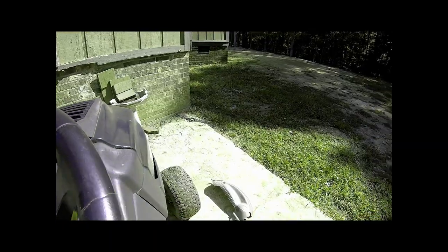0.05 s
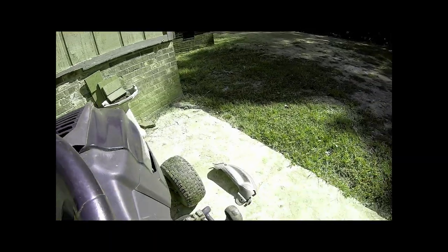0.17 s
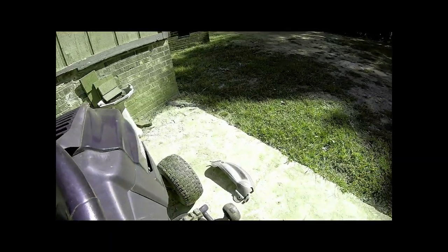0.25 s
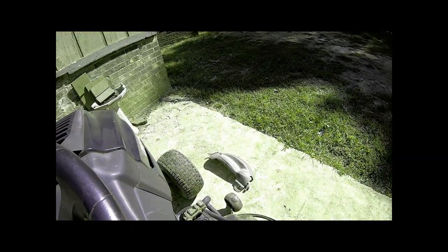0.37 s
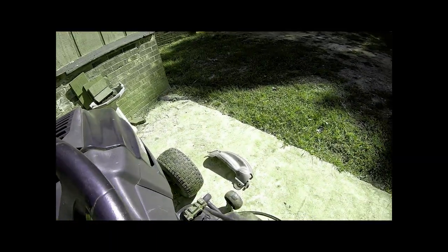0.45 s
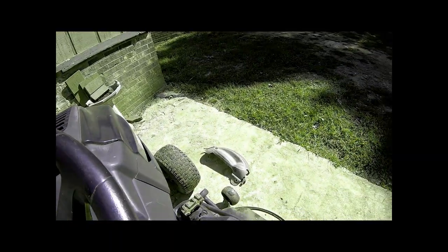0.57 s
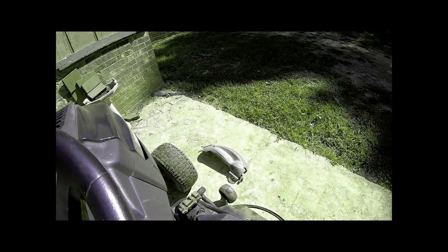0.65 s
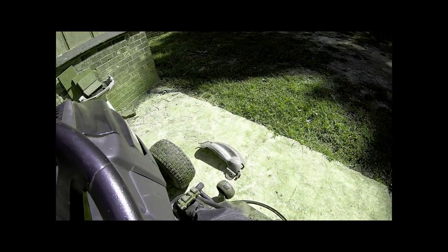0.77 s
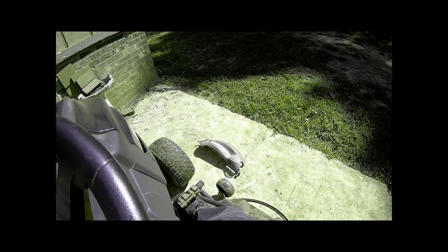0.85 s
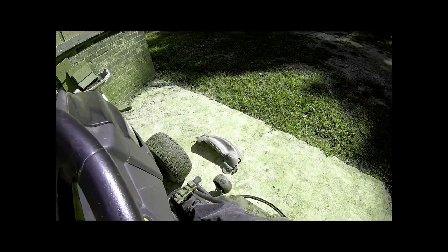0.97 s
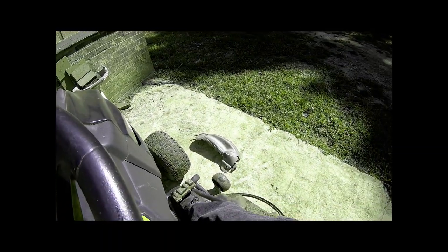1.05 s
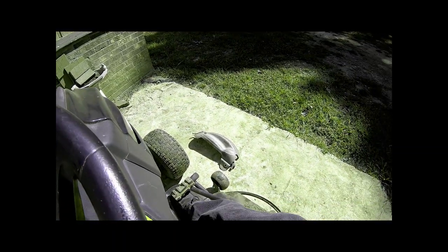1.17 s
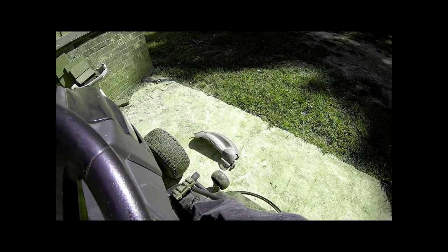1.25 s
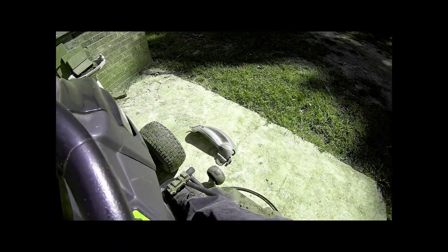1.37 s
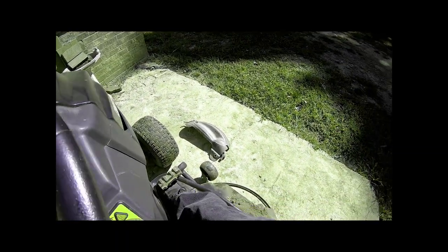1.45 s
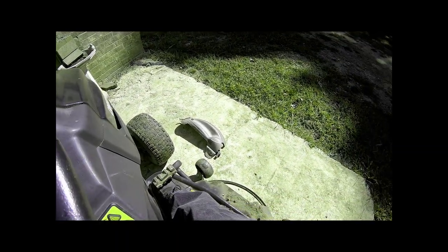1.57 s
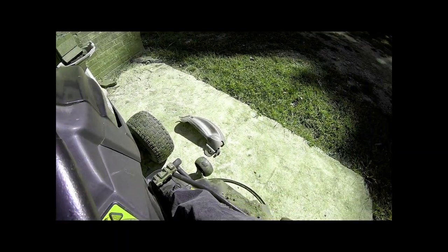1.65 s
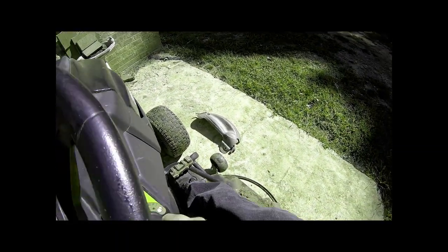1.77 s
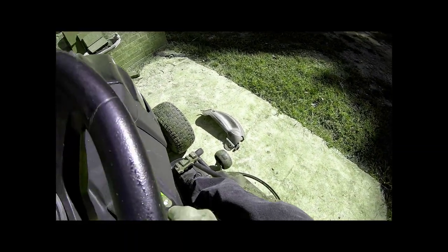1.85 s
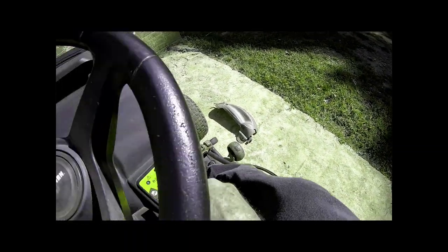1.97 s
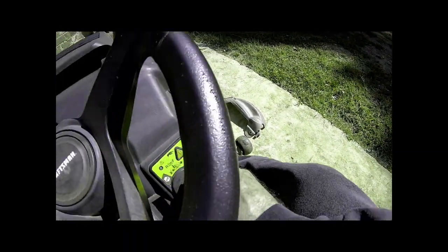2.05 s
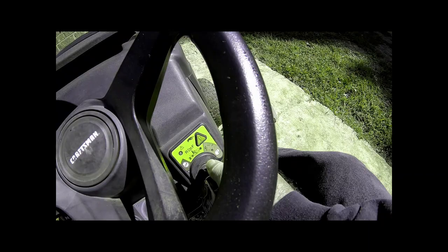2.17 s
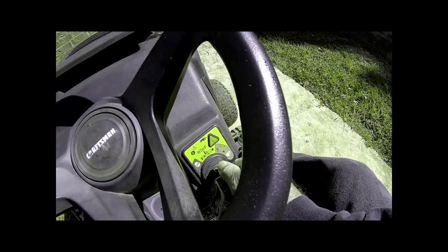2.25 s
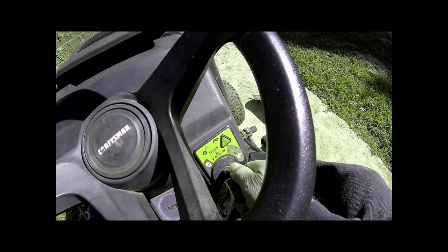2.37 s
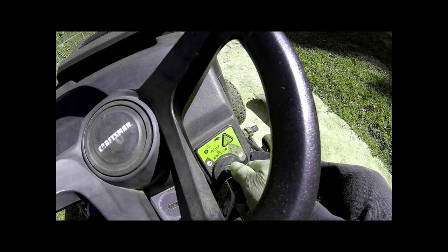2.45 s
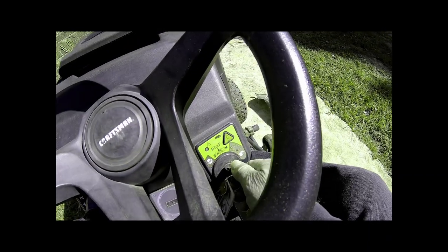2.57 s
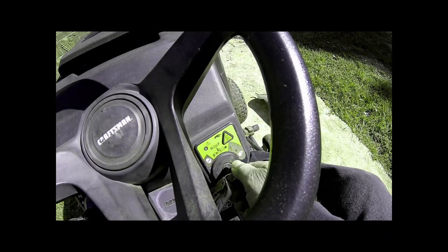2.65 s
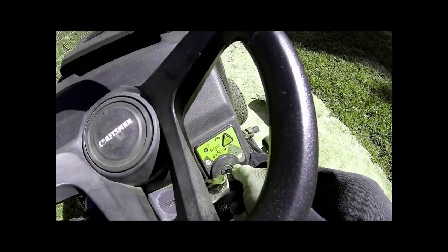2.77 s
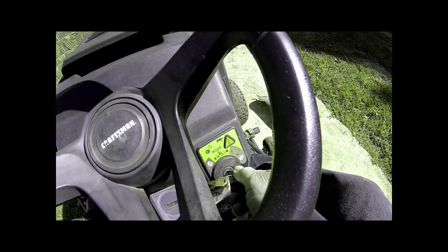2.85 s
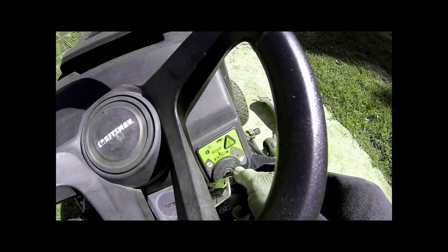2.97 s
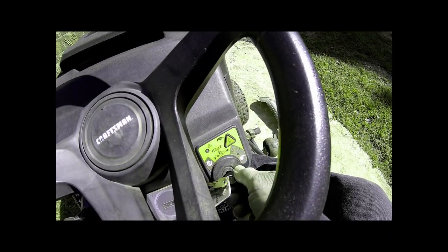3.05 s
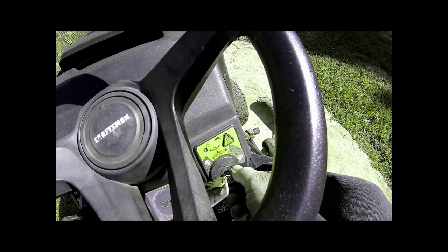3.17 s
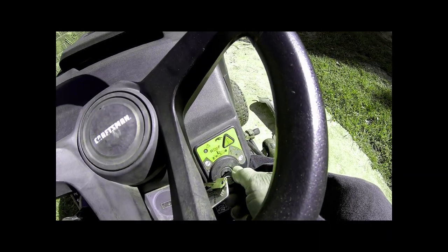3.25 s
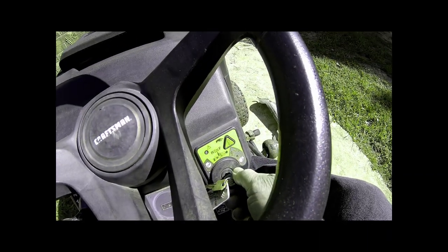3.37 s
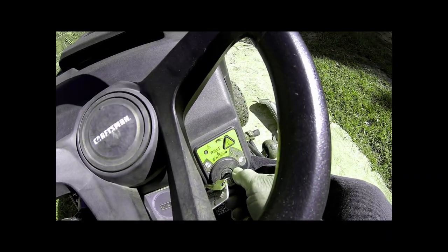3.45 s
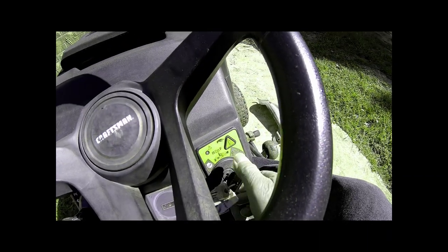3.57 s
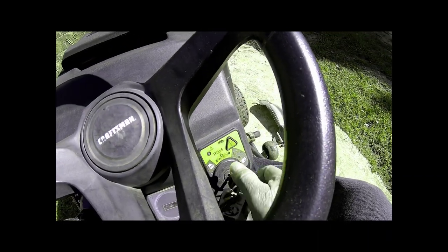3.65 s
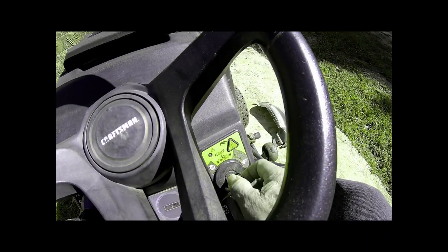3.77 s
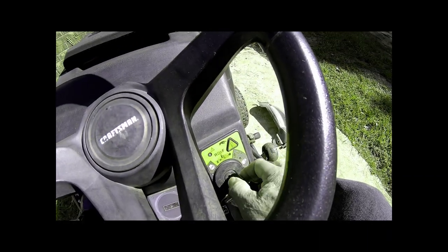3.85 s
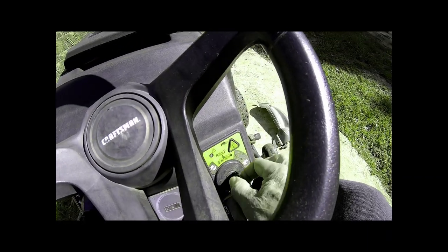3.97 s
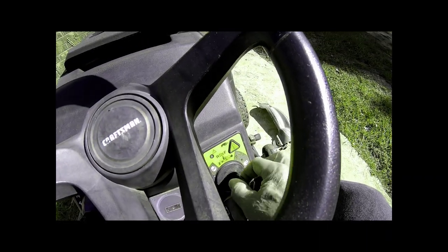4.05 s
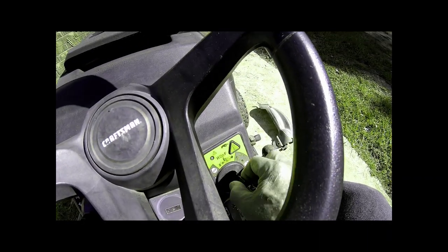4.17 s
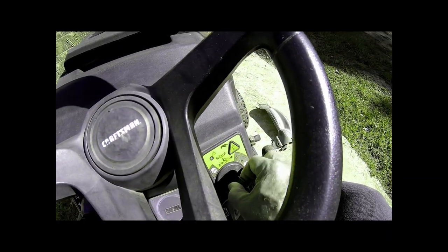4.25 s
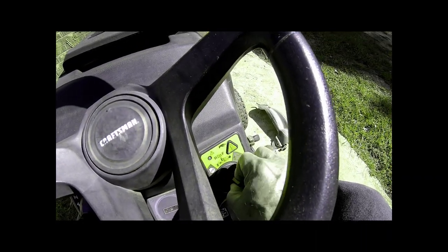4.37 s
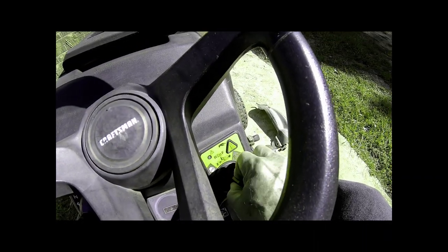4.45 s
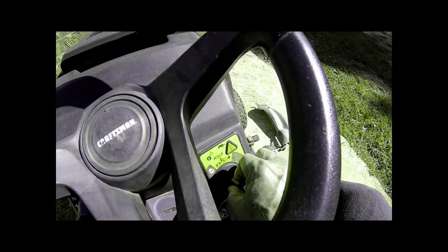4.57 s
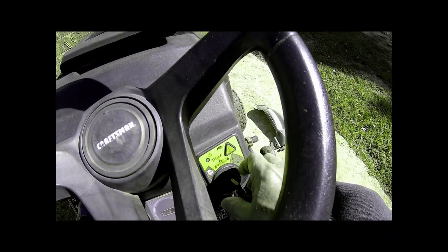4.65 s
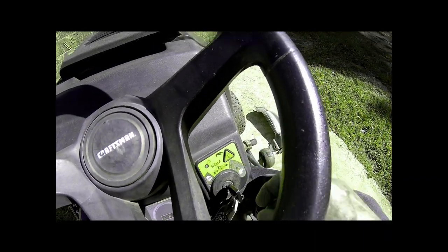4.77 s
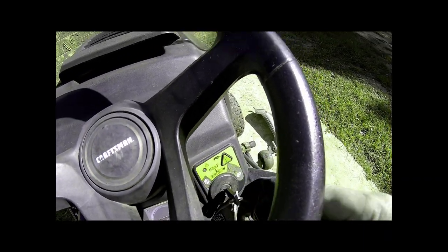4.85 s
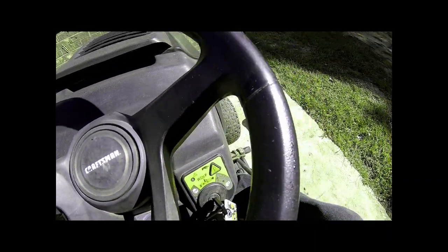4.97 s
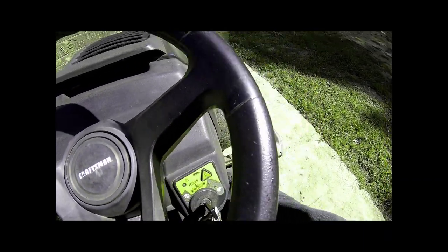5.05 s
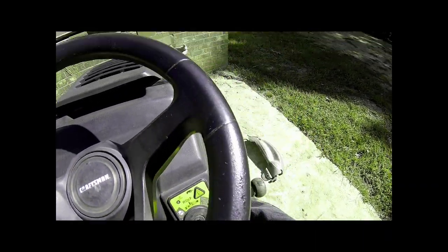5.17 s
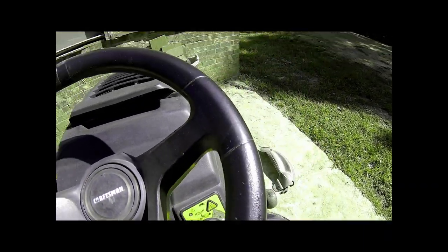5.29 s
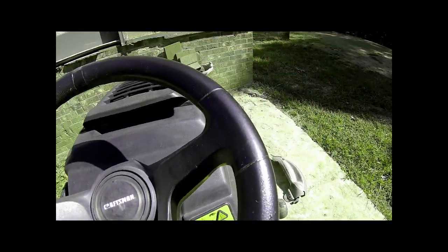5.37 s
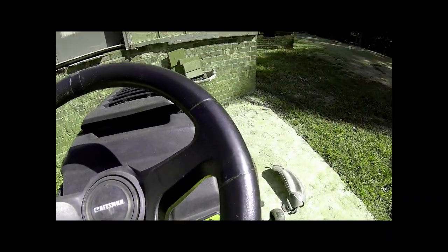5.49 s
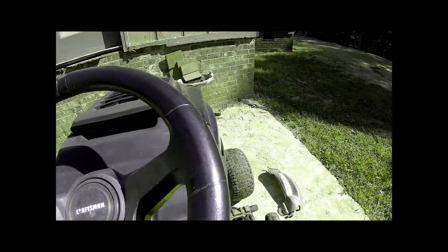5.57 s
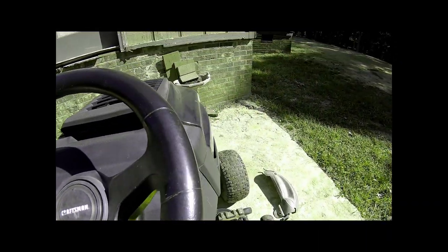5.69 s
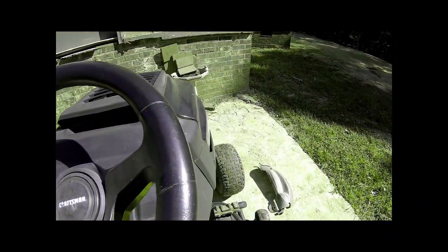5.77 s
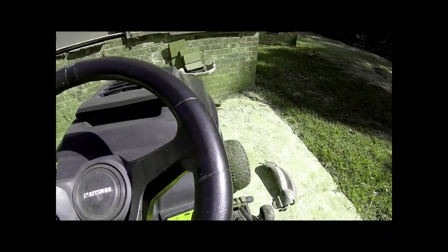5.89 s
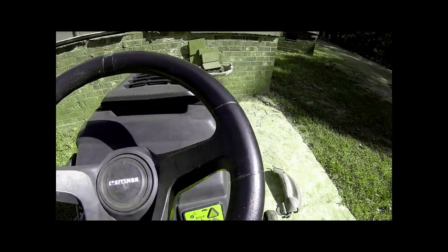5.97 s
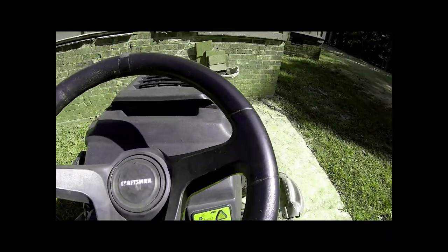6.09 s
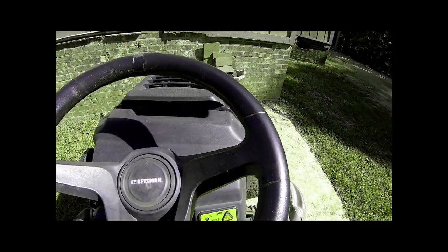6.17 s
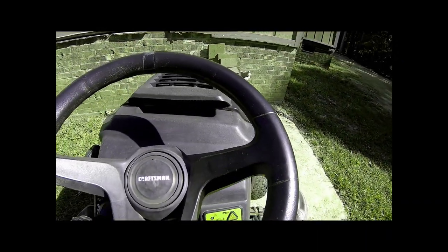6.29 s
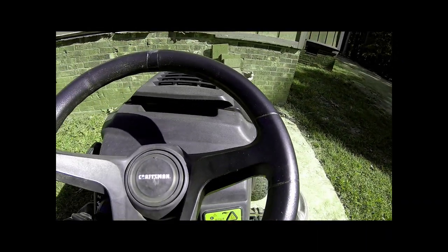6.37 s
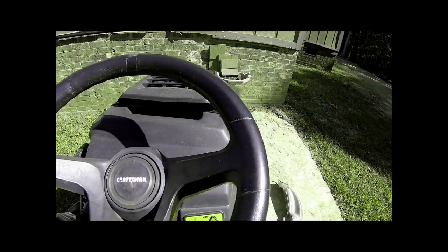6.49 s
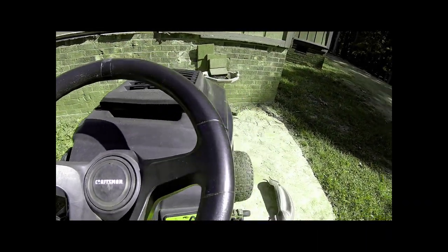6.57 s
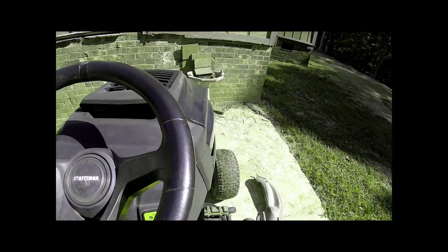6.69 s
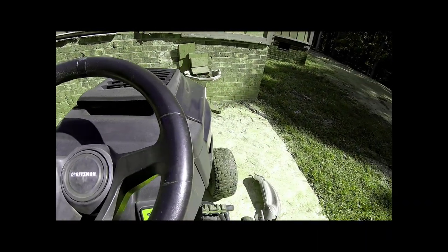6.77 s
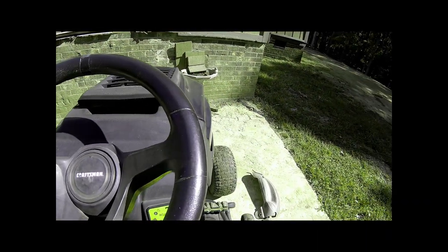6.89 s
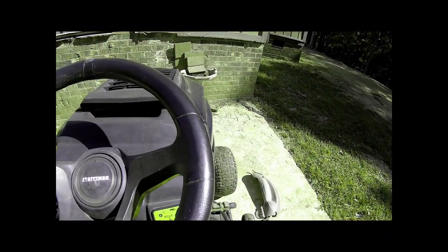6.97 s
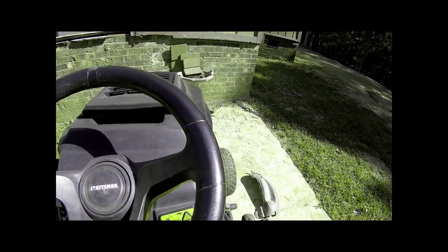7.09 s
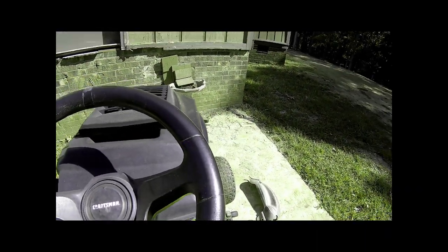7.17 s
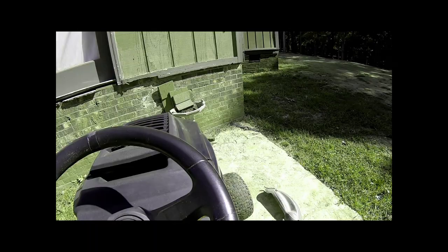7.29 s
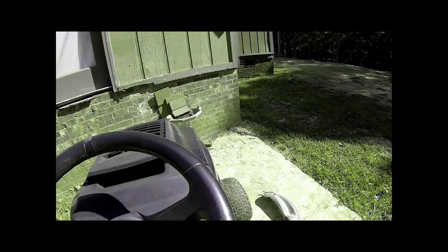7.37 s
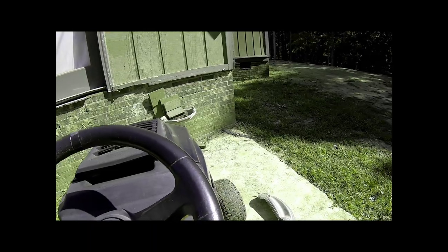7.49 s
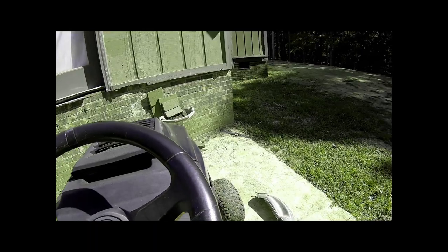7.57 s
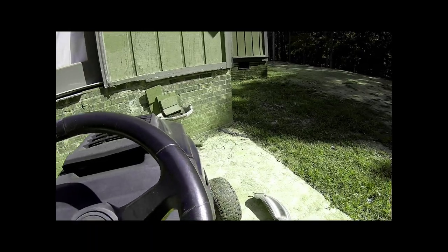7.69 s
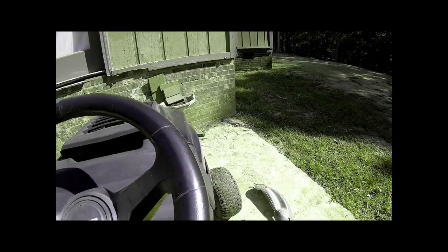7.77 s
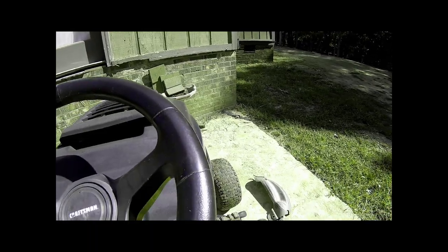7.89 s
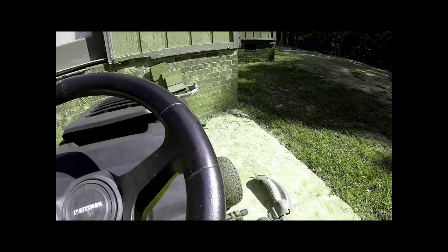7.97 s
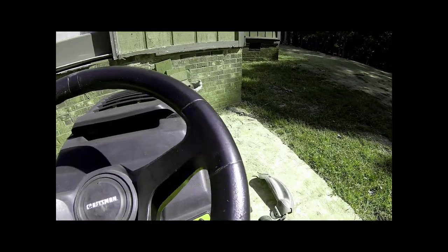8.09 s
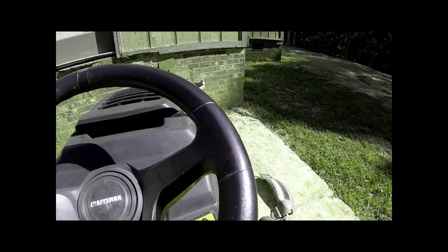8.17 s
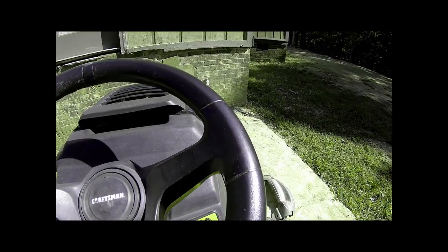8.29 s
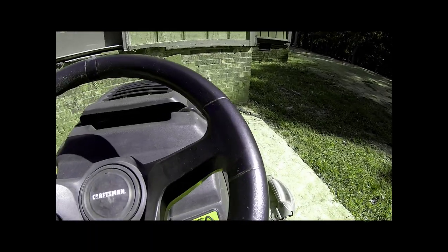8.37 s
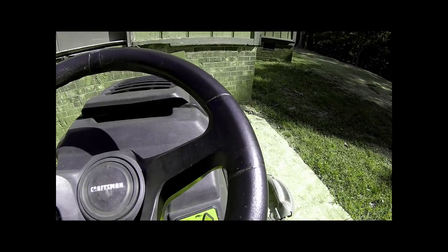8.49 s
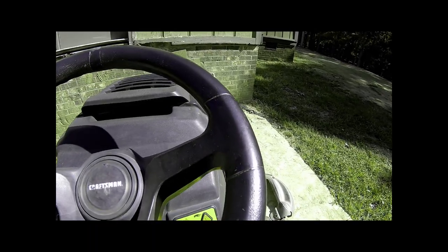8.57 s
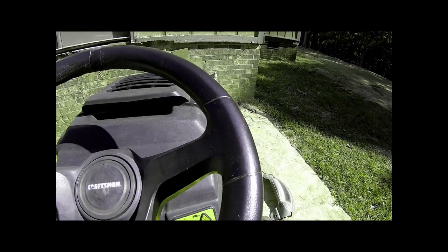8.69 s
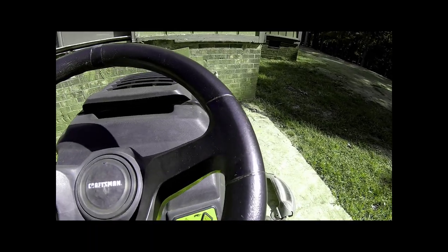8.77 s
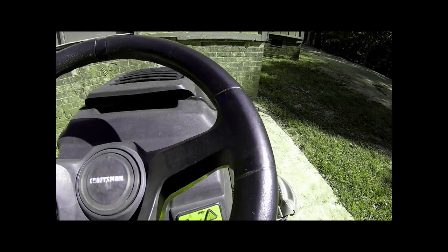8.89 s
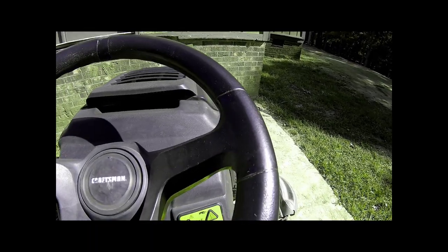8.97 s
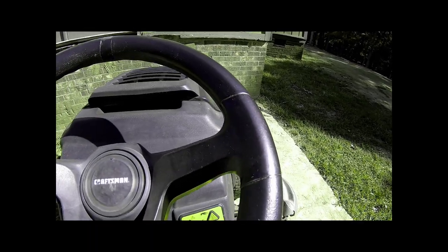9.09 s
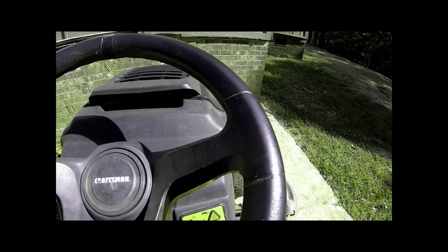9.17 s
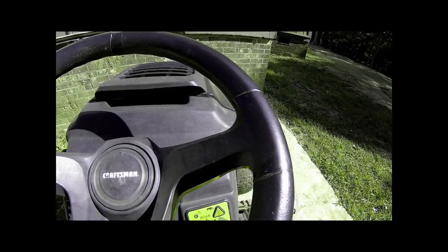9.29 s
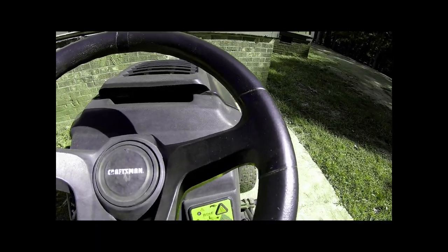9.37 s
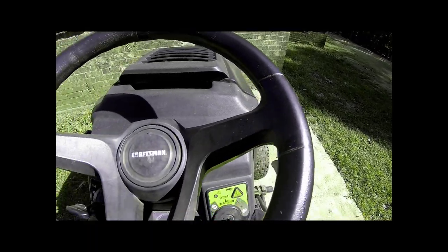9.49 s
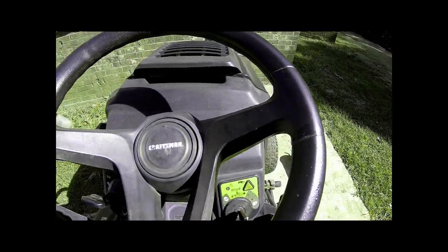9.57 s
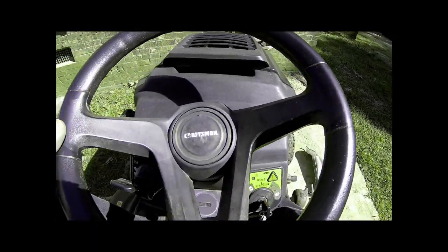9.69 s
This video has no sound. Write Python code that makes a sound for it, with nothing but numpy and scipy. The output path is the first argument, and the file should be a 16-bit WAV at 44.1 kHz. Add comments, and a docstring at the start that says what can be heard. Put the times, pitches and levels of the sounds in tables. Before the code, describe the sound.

After some soft clunks and creaks, a riding mower cranks briefly, fires and settles into a steady, rattling drone.

```python
"""First you hear a driver settle on a lawn tractor: the seat creaks, the pedal clunks, keys jingle.
Then the starter grinds, and the single cylinder catches, speeds up and runs at a steady pace.
Each engine cycle gives a puff of exhaust, a knock and a gulp of air; at speed the strokes merge into
a drone, while the tin hood rattles and the cooling fan hisses. It is all heard from the seat,
through a closed camera housing that a light wind buffets."""
import sys
import numpy as np
from scipy import signal
from scipy.fft import rfft, irfft, next_fast_len
from scipy.io import wavfile
from scipy.ndimage import uniform_filter1d, map_coordinates

SR = 44100
rng = np.random.default_rng(int(sys.argv[2]) if len(sys.argv) > 2 else 0)


def log_audio(samples):
    """Write samples as a 16-bit WAV file to the path given in sys.argv[1]."""
    # one column per channel
    frames = np.atleast_2d(samples).T
    # limit to full scale, then quantise
    limited = np.clip(frames, -1, 1)
    pcm = np.round(limited * 32767).astype(np.int16)
    wavfile.write(sys.argv[1], SR, pcm)


N = 429093
TIME = np.arange(N) / SR
STEADY_RATE = 28.3  # engine cycles a second, held by the governor (the speed regulator)


# The first slow firings (time [s], exhaust [dB], knock [dB], air gulp compared with exhaust [dB])
FIRINGS = [(3.165, 2, -45, -9.5), (3.302, -3.5, -63, -4.5), (3.46, -1, -53.5, -6), (3.612, 3, -42.5, -10),
           (3.745, 2.5, -34.5, -9.5), (3.851, 2, -40.5, -11), (3.94, 0.5, -40, -2.5), (4.02, 2, -37.5, -4),
           (4.084, 2.5, -36.5, -2.5), (4.138, 3, -36, -11)]
# How fast the engine runs after them (time [s], rate [cycles/s])
ENGINE_SPEED = [(4.14, 19.7), (4.29, 22.3), (4.61, 25.5), (4.68, 27.7), (4.75, 29.2), (5.07, 29.1),
                (5.55, 28.6), (6.21, 28.3), (8.1, 28.3), (8.5, 27.8), (8.87, 27.2), (9.17, 27.2),
                (9.48, 27.8), (9.73, 27.7)]
def engine():
    """One cylinder fires once a cycle; its speed steers the drone, the knock and the rattle."""
    first_times = np.transpose(FIRINGS)[0]
    first_rates = list(zip(first_times[:-1], 1 / np.diff(first_times)))
    rate = curves(first_rates + ENGINE_SPEED)[0]
    settled = np.clip((rate - 25.5) / 0.83, 0, 1)  # 0 while working hard, 1 near full speed
    cycles = np.cumsum(rate * (TIME > first_times[-1])) / SR
    fire_samples = np.flatnonzero(np.diff(np.floor(cycles)))
    fire_times = np.concatenate([first_times, TIME[fire_samples]])
    metal = knock(fire_times, fire_samples, rate, settled) + rattle(fire_times, rate, settled)
    return drone(cycles, settled) + first_strokes() + metal


# The drone's tones while the engine works hard (multiple of the cycle rate, level [dB])
WORKING_TONES = [(1, -23), (2, -8), (3, -5), (4, -11), (5, 0.5), (6, 2), (7, 3), (8, -1), (9, -10),
                 (10, -1.5), (11, -7.5), (12, -16), (13, -26), (14, -21), (15, -15), (16, -8), (17, -18),
                 (18, -28.5), (19, -28.5), (20, -29), (21, -33), (22, -37), (23, -36), (24, -49),
                 (25, -38.5), (26, -43), (27, -43), (28, -43.5), (29, -39), (30, -39.5), (31, -38),
                 (32, -36), (33, -35), (34, -26.5)]
# The same tones at the steady pace (multiple of the cycle rate, level [dB])
STEADY_TONES = [(1, -24), (2, -13), (3, -19), (4, -20), (5, 0), (6, 0), (7, -7), (8, -4), (9, -17),
                (10, -14), (11, -20), (12, -22), (13, -20), (14, -19), (15, -21), (16, -26), (17, -25),
                (18, -33), (19, -37), (20, -40), (21, -42), (22, -39), (23, -42), (24, -31), (25, -32),
                (26, -29), (27, -39), (28, -34), (29, -31), (30, -33), (31, -38), (32, -37), (33, -33),
                (34, -34)]
# Muffler and low exhaust pipe ringing, which delays each tone (pitch [Hz], width [Hz], level [dB])
PIPE_RINGS = [(177, 40, 0), (45, 30, -6)]
def drone(cycles, settled):
    """Fast puffs and gulps merge into tones at whole multiples of the cycle rate."""
    gulp = .45 + .45 * settled  # the intake grows against the exhaust as the work eases
    slip = 0.0051 * wobble(34)  # strokes never repeat exactly
    tones, power = np.zeros(N), np.zeros(N)
    for (multiple, working_db), (_, steady_db) in zip(WORKING_TONES, STEADY_TONES):
        size = amp(working_db + settled * (steady_db - working_db))
        puff_and_gulp = 1 + gulp * np.exp(-2j * np.pi * multiple * .613)  # gulp 0.613 of a cycle later
        phase = np.angle(puff_and_gulp * resonances(PIPE_RINGS, multiple * STEADY_RATE))
        phase += (multiple > 10) * rng.uniform(0, 2 * np.pi)  # hood and ground scatter short waves
        jitter = multiple * (slip + 0.0046 * wobble(25))
        tones += size * amp(0.88 * wobble(5.9)) * np.cos(2 * np.pi * multiple * cycles + phase + jitter)
        power += size ** 2 / 2
    fade_in = np.clip((TIME - 4.15) / 0.024, 0, 1)
    level_db = -13.5 + 0.1 * TIME
    return amp(level_db) * fade_in * tones / np.sqrt(power)


# How the gas in the exhaust pipe, the muffler and the air box ring (pitch [Hz], width [Hz], level [dB])
EXHAUST_RINGS = [(63.4, 37, -2.5)]
MUFFLER_RINGS = [(172.7, 22.8, 0), (263, 155, -17), (374, 45, -22)]
AIRBOX_RINGS = [(74.4, 50, -5), (146, 38, -3)]
def first_strokes():
    """Slow strokes come one by one: a low push, the muffler's ring just after it, then a gulp of air."""
    def through_valve(times, levels_db, rings):
        """A valve takes a millisecond to open, which softens each pulse."""
        return filtered(pulses(times, levels_db), lambda f: resonances(rings, f) / (1 + 1j * f / 300) ** 2)

    times, exhaust_db, _, gulp_db = np.transpose(FIRINGS)
    push = through_valve(times - .004, exhaust_db + 41.5, EXHAUST_RINGS)
    ring = through_valve(times + .0052, exhaust_db + 44, MUFFLER_RINGS)
    gulp_times = times[:-1] + .635 * np.diff(times)  # part of the way to the next firing
    gulps = through_valve(gulp_times, (exhaust_db + gulp_db)[:-1] + 44.5, AIRBOX_RINGS)
    return push + ring + gulps


# How the engine block and starter case ring (pitch [Hz], width [Hz], level [dB])
BLOCK_RINGS = [(476, 24, -2), (744, 29, 3), (964, 100, 1), (1243, 130, -1.5), (1540, 380, -13),
               (1808, 100, -3.5), (2450, 860, -15.5)]
# How the cylinder head and its fins ring (pitch [Hz], width [Hz], level [dB])
HEAD_RINGS = [(4380, 180, 1.5), (5100, 690, -4)]
# The hiss that gets through the housing, for every hissy sound here (pitch [Hz], level [dB])
HISS_COLOUR = [(2000, -34.5), (2900, -10.5), (3500, -7.5), (4400, 2), (5200, -1.5), (6300, -14.5),
               (7500, -26), (9000, -29), (10600, -40), (12200, -19.5), (14000, -24.5), (15700, -29)]
def knock(fire_times, fire_samples, rate, settled):
    """Each firing hammers the engine's metal, more gently once it is up to speed."""
    speed_drop_db = np.interp(rate, (27.6, 29), (0, 11.5))
    seconds_settled = np.cumsum(settled) / SR
    running_db = -40 - speed_drop_db - 3 * seconds_settled
    later_db = running_db[fire_samples] + 3.2 * rng.standard_normal(len(fire_samples))
    levels_db = np.concatenate([np.transpose(FIRINGS)[2], later_db])
    hits = bursts(fire_times + .001, levels_db, fade_s=0.091, rise_s=0.005)
    sizzle = amp(-4.5) * unit(np.gradient(noise(HISS_COLOUR, patchy_db=1.2)))
    return hits * (sizzle + amp(-5) * ringing(HEAD_RINGS) + amp(6) * ringing(BLOCK_RINGS))


# Loudness of tin, chassis and fan (base level [dB], rise per doubled speed [dB], hard-work extra [dB])
RATTLE_LEVELS = [(-37, 2.5, -1), (-31, 5, 9), (-51, 7.5, 4.5)]
# The noise of the tin hood and deck, and the chassis rumble (pitch [Hz], level [dB])
TIN_COLOUR = [(310, -36), (520, -0.5), (592, -14), (716, -1.5), (778, -4.5), (955, -1.5), (1210, -1.5),
              (1330, -9), (1460, -5), (1570, -9), (1880, -8), (2190, -12), (3200, -22.5), (4160, -32),
              (7040, -120)]
CHASSIS_COLOUR = [(20, -24), (60, -8), (110, -9), (180, -1), (260, -1), (340, 0), (430, -4), (510, -18),
                  (600, -32), (800, -80)]
# How one buzzing hood panel rings (pitch [Hz], width [Hz], level [dB])
PANEL_RINGS = [(1863, 130, 0)]
def rattle(fire_times, rate, settled):
    """Each firing shakes the tin; the chassis rumbles and the fan hisses, all following the speed."""
    tin_db, chassis_db, fan_db = [db + speed_db * np.log2(rate / STEADY_RATE) + work_db * (1 - settled)
                                  for db, speed_db, work_db in RATTLE_LEVELS]
    shake = 1.21 + bursts(fire_times, np.full(len(fire_times), -6), fade_s=0.0098, rise_s=0.0017)
    tin = amp(tin_db - 1.5 + 0.57 * wobble(1.1)) * noise(TIN_COLOUR, patchy_db=0.5)
    panel = amp(tin_db - 13) * ringing(PANEL_RINGS)
    chassis = amp(chassis_db) * noise(CHASSIS_COLOUR, patchy_db=0)
    fan = amp(fan_db + 0.56 * wobble(10) + 0.6 * wobble(1.5)) * noise(HISS_COLOUR, patchy_db=0.4)
    return (TIME > fire_times[0]) * (shake * (tin + panel) + chassis + fan)


# The starter turning the engine (time [s], rate of teeth meeting [Hz], grind [dB], gear [dB])
CRANKING = [(2.628, 234, -41.5, -42), (2.66, 250.5, -18, -18), (2.694, 268.5, -26, -14),
            (2.755, 401.2, -21, -13.5), (2.81, 331.4, -31, -15), (2.86, 285.8, -23.5, -19.5),
            (2.91, 252, -22.5, -18), (2.95, 259.4, -25.5, -29), (3.008, 258.5, -20.5, -23),
            (3.048, 264, -30.5, -26.5), (3.08, 276.4, -21, -18.5), (3.15, 290, -23, -20),
            (3.23, 252.7, -39.5, -29.5)]
# How the tractor's frame rings (pitch [Hz], width [Hz], level [dB])
FRAME_RINGS = [(148, 250, -2.5), (234, 130, 2.5), (406, 170, -2.5)]
# Solenoid click, gear jolts and compression thumps (time [s], level [dB], pitch [Hz], fade time [s])
STARTING_HITS = [(2.638, -25, 850, .04), (2.658, -1, 243, 0.069), (2.678, -1, 242, 0.058),
                 (2.901, -15, 71.2, 0.064), (3.081, -14.5, 69.6, 0.04), (3.136, -5, 257, 0.12)]
def starter():
    """The solenoid (a magnetic switch) clicks, the gear jolts and grinds on the flywheel,
    and the piston's compression gives low thumps."""
    _, grind_db, gear_db = curves(CRANKING, outside=-120)
    tooth_hz = curves(CRANKING)[0] * (1 + .035 * wobble(60))
    teeth = np.sin(2 * np.pi * np.cumsum(tooth_hz) / SR)
    whine = amp(gear_db - 5 + 2.8 * wobble(50)) * teeth
    bite = 1 + 0.41 * teeth + 0.095 * wobble(70)  # each tooth shakes the metal
    grind = amp(grind_db - 4.5) * ringing(BLOCK_RINGS)
    brush_db = -37 + 1.3 * (grind_db + 23.5)  # the motor's sliding contacts hiss with the grind
    brushes = amp(brush_db) * noise(HISS_COLOUR, patchy_db=-3)
    frame = amp(gear_db - 1) * ringing(FRAME_RINGS)
    hits, t = np.zeros(N), TIME[:SR // 10]
    for start, db, hz, fade_s in STARTING_HITS:
        loudness = amp(db - 60 * t / fade_s) * (1 - np.exp(-t / 0.0022))
        hits[round(start * SR):][:len(t)] += loudness * np.sin(2 * np.pi * hz * t)
    return whine + bite * (grind + brushes) + frame + hits


# Bumps on pedal and seat (time [s], level [dB], extra for the thud [dB], extra for the tick [dB])
BUMPS = [(0.01, -39, -6, -22), (0.084, -36.5, 2, -21), (0.143, -44.5, -8, -21), (0.324, -48.5, -5, 0),
         (0.361, -49, 22.5, -30), (0.394, -57, 3, -25), (0.572, -66, 3, -18), (0.626, -53, 17, 2),
         (0.71, -55.5, 16, 0), (0.799, -55, 2, -14), (0.826, -54.5, 6, 6.5), (0.889, -45.5, -17, 3.5),
         (0.942, -34.5, 21, -5), (1.044, -56.5, -3, 9.5), (1.074, -45, -5, -7), (1.093, -30, 0, -11.5),
         (1.174, -32, -12, -13.5), (1.948, -51, -13, -5.5), (2.006, -47, -11, 6)]
# The pedal's clack (pitch [Hz], level [dB])
PEDAL_COLOUR = [(350, 7.5), (600, -9), (794, -11), (1270, 2.5), (1560, -2.5), (1920, -3.5), (2560, -11),
                (3200, -13), (4160, -10), (7040, -120)]
# How the seat rings (pitch [Hz], width [Hz], level [dB])
SEAT_RINGS = [(188, 53.4, 8), (282, 100, 1.5), (422, 110, -2)]
def clunks():
    """Each bump gives a clack from the pedal, a bright tick and a dull thud from the seat."""
    times, db, thud_db, tick_db = np.transpose(BUMPS)
    clack = bursts(times, db + 0.5, fade_s=0.057, rise_s=0.0016) * noise(PEDAL_COLOUR, patchy_db=1.2)
    tick = bursts(times, db + tick_db - 10, fade_s=0.072, rise_s=0.0014) * noise(HISS_COLOUR, 1.2)
    blows = pulses(times, db + thud_db + 29.5)
    thud = filtered(blows, lambda f: resonances(SEAT_RINGS, f) / (1 + 1j * f / 600))
    return clack + tick + thud


# The driver's movements (start [s], length [s], seat creak [dB], cloth [dB])
MOVEMENTS = [(-0.06, 0.11, -39.5, -44.5), (0.05, 0.061, -37.5, -43), (0.1, .16, -61, -55.5),
             (0.33, .3, -55.5, -77.5), (0.6, .16, -40.5, -69), (0.75, 0.33, -46.5, -68),
             (0.945, 0.054, -31, -58.5), (1.0, 0.26, -44, -60), (1.23, 0.12, -44, -70.5),
             (1.47, 0.15, -56.5, -69.5), (1.9, 0.21, -63, -66.5), (2.25, 0.17, -66, -70.5)]
# The rustle of clothes (pitch [Hz], level [dB])
CLOTH_COLOUR = [(300, -41), (500, -2.5), (900, -4), (1800, -7.5), (2950, -19.5), (3850, -11.5), (6300, -30),
                (10500, -56), (12400, -44.5), (15700, -51.5)]
def shifting_driver():
    """The seat creaks and clothes rub as the driver moves."""
    creak, cloth = swells(MOVEMENTS, rest_db=[-60, -70.5])
    return creak * ringing(SEAT_RINGS) + cloth * noise(CLOTH_COLOUR, patchy_db=2)


# Jingles of the key ring (time [s], level [dB])
JINGLES = [(0.679, -69), (0.7107, -61), (0.8057, -53.5), (0.839, -55.5), (0.8919, -48), (0.9437, -63),
           (0.9854, -65.5), (1.0789, -55), (1.1009, -46.5), (1.175, -46), (1.1914, -53), (1.2385, -55.5),
           (2.009, -54), (3.444, -64), (3.5262, -43), (3.538, -44)]
# The notes of the brass keys (pitch [Hz], level [dB], fade time [s])
KEY_NOTES = [(4086, -16, 0.077), (5830, -13, 0.08), (8726, -20, .05), (10960, -12, .04),
             (12190, -17, 0.071), (12510, 0, 0.055), (15060, -8, .07)]
def keys():
    """Each jingle rings the keys at new strengths and slightly new pitches, with a short scratch."""
    out, t = np.zeros(N), TIME[:SR // 5]
    for start, db in JINGLES:
        ring = np.zeros(len(t))
        for hz, note_db, fade_s in KEY_NOTES:
            loudness = amp(note_db + rng.normal(0, 5.1) - 60 * t / fade_s)
            ring += loudness * np.sin(2 * np.pi * hz * rng.normal(1, 0.0077) * t)
        scratch = .6 * amp(-60 * t / .045) * np.diff(rng.standard_normal(len(t) + 1))
        out[round(start * SR):][:len(t)] += amp(db - 5) * (ring + scratch) * (1 - np.exp(-t / .002))
    return out


# Short drags across plastic (start [s], length [s], level [dB])
DRAGS = [(-0.03, 0.21, -50), (0.12, 0.13, -56), (0.34, 0.086, -61.5)]
# How the plastic rings (pitch [Hz], width [Hz], level [dB])
PLASTIC_RINGS = [(1770, 200, 2.5), (3880, 330, -9)]
def scrapes():
    """Something drags unevenly over hard plastic and makes it ring."""
    return swells(DRAGS, rest_db=[-90])[0] * amp(3 * wobble(40)) * ringing(PLASTIC_RINGS)


# Puffs of wind (start [s], length [s], level [dB])
WIND_GUSTS = [(-0.03, 0.32, -36), (0.33, .12, -43.5), (1.22, 0.32, -49.5), (1.56, 0.37, -49),
              (2.04, .22, -45.5), (2.36, 0.29, -50.5)]
# The wind's low rumble (pitch [Hz], level [dB])
WIND_COLOUR = [(15, -13), (35, -6), (70, -11), (110, -20), (170, -73.5)]
def wind():
    """Light wind buffets the housing with a fluttering rumble."""
    gusts = swells(WIND_GUSTS, rest_db=[-59.5])[0]
    return gusts * amp(2.5 * wobble(13)) * noise(WIND_COLOUR, patchy_db=1.5)


def amp(db):
    """Turn decibels into a number to multiply by."""
    return 10 ** (np.asarray(db) / 20)


def unit(x):
    """Scale a sound to an average strength (rms) of 1."""
    return x / np.sqrt(np.mean(x ** 2) + 1e-20)


def curves(rows, outside=None):
    """Join a table's points with straight lines: one curve for each column after the time."""
    times, *columns = np.transpose(rows)
    return [np.interp(TIME, times, column, outside, outside) for column in columns]


def wobble(rate):
    """A smooth curve through `rate` random values a second."""
    return map_coordinates(rng.standard_normal(int(N * rate / SR) + 4), [TIME * rate])


def filtered(x, response):
    """Strengthen, weaken and delay each pitch in x as the function `response` says."""
    size = next_fast_len(N + SR // 2)
    return irfft(rfft(x, size) * response(np.fft.rfftfreq(size, 1 / SR)), size)[..., :N]


def resonances(rings, f):
    """How a body that rings at a few pitches responds at frequency f."""
    return sum((-1) ** k * amp(db) * 1j * f * width / (hz * hz - f * f + 1j * f * width)
               for k, (hz, width, db) in enumerate(rings))


def ringing(rings):
    """Noise of strength 1 through a ringing body, with pitches far below or above it cut away."""
    low_hz, high_hz = 0.53 * rings[0][0], 1.29 * rings[-1][0]
    edges = lambda f: f ** 4 / (f ** 4 + low_hz ** 4) / (1 + (f / high_hz) ** 6)
    return unit(filtered(rng.standard_normal(N), lambda f: resonances(rings, f) * edges(f)))


def noise(colour, patchy_db):
    """Noise of strength 1 with a colour (its balance of low and high) and random louder patches."""
    spectrum = signal.stft(rng.standard_normal(N + 512), nperseg=512)[2]
    patches = uniform_filter1d(uniform_filter1d(rng.standard_normal(spectrum.shape), 4, 0), 8, 1)
    white = signal.istft(spectrum * amp(patchy_db * unit(patches)), nperseg=512)[1][:N]
    hz, db = np.transpose(colour)
    return unit(filtered(white, lambda f: amp(np.interp(np.log(f + 1), np.log(hz + 1), db))))


def pulses(times, levels_db):
    """One click at each time."""
    samples = np.round(np.asarray(times) * SR).astype(int)
    return np.bincount(samples, amp(levels_db), N + SR)[:N]


def bursts(times, levels_db, fade_s, rise_s):
    """A loudness curve that jumps at each time, then falls 60 dB in the fade time."""
    t = TIME[:SR // 5]
    shape = amp(-60 * t / fade_s) * (1 - np.exp(-t / rise_s))
    return signal.fftconvolve(pulses(times, levels_db), shape / shape.max())[:N]


def swells(rows, rest_db):
    """A loudness curve for each level column: a resting level plus one rounded swell a row."""
    start, length, *columns = np.transpose(rows)
    progress = np.clip((TIME - start[:, None]) / length[:, None], 0, 1)
    return [amp(rest) + amp(db) @ np.sin(np.pi * progress) for db, rest in zip(columns, rest_db)]


def scene():
    """Everything reaches one microphone."""
    return (engine() + starter() + clunks() + shifting_driver() + keys() + scrapes() + wind())[None]


def record(dry):
    """The camera rounds off the loudest peaks and drops the very highest pitches."""
    ceiling, top_hz = .8, 15800
    rounded = dry / (1 + np.abs(dry / ceiling) ** 6) ** (1 / 6)
    return filtered(rounded, lambda hz: hz < top_hz)


dry = scene()
out = record(dry)
log_audio(out)
```